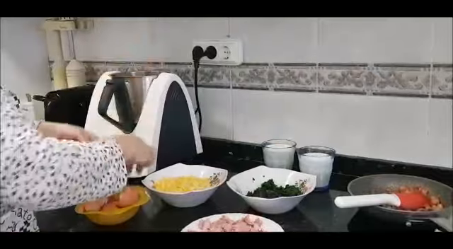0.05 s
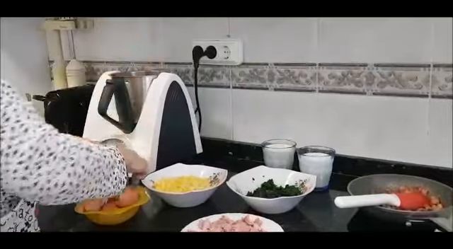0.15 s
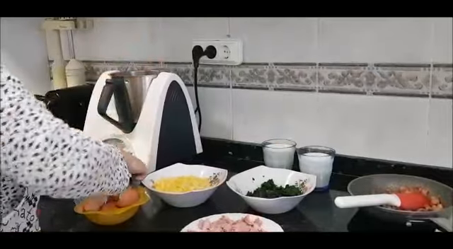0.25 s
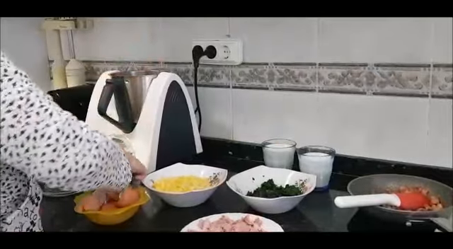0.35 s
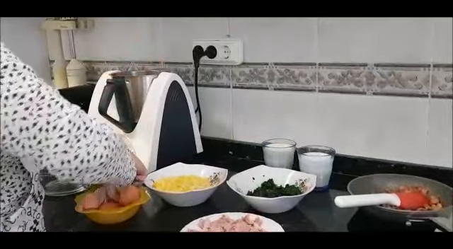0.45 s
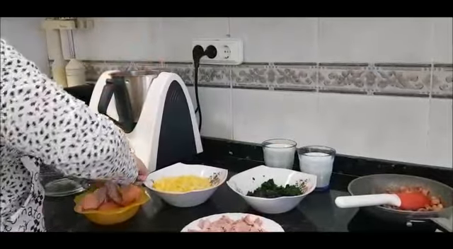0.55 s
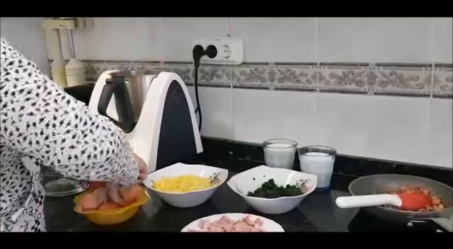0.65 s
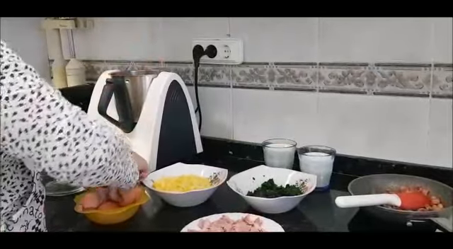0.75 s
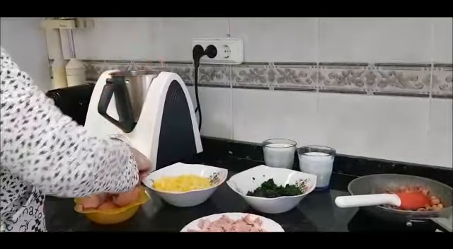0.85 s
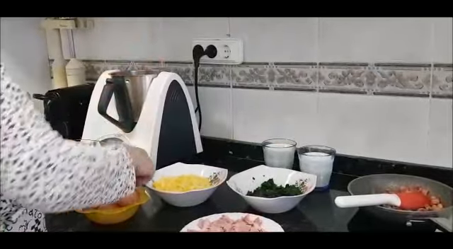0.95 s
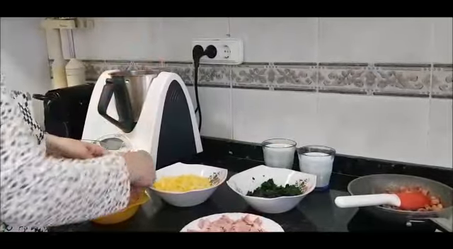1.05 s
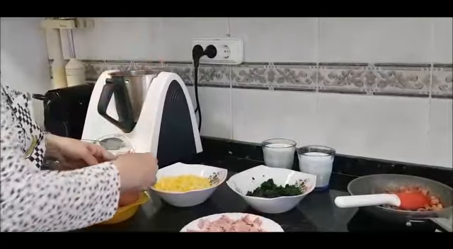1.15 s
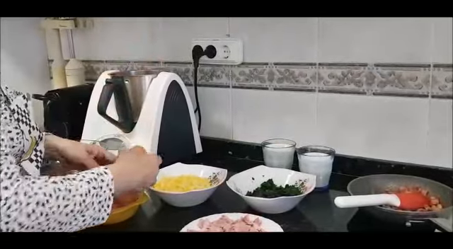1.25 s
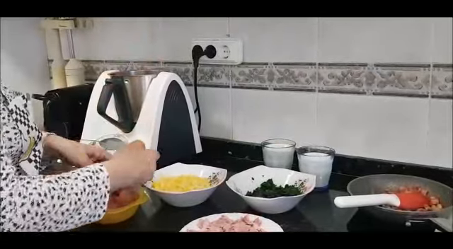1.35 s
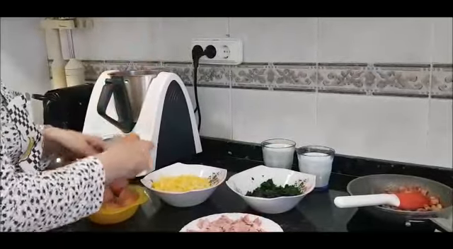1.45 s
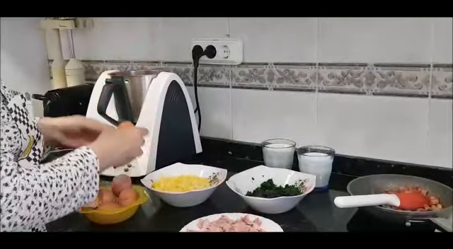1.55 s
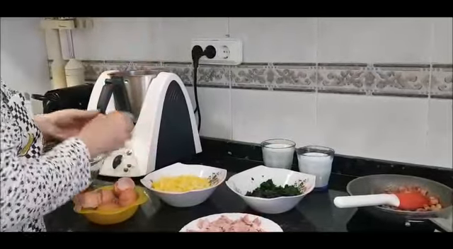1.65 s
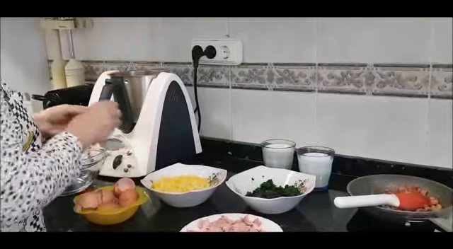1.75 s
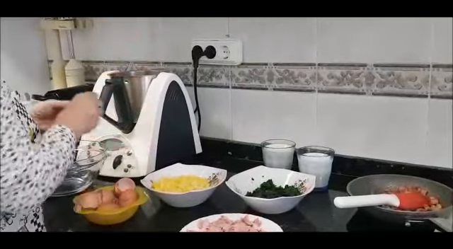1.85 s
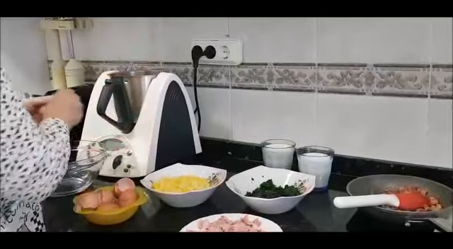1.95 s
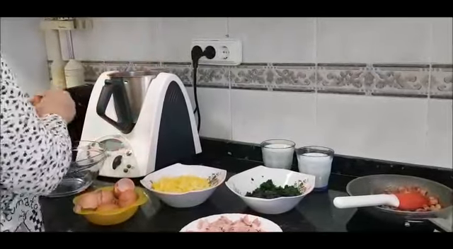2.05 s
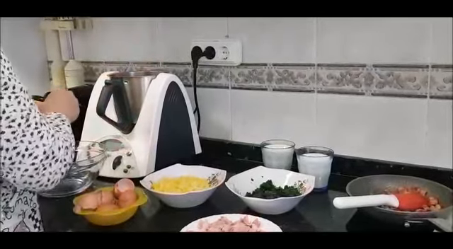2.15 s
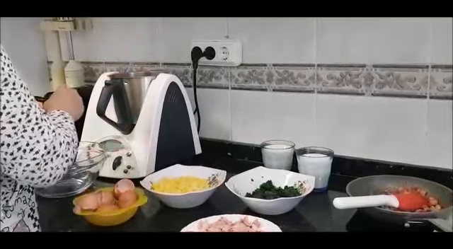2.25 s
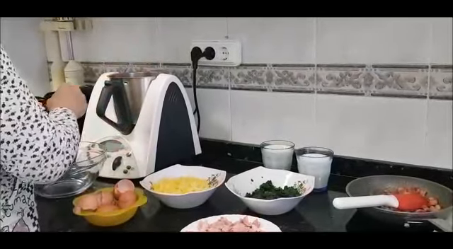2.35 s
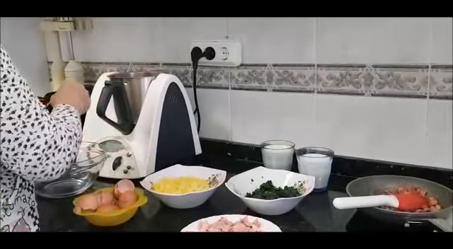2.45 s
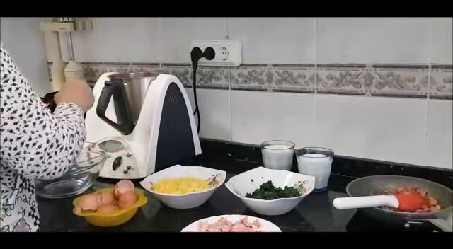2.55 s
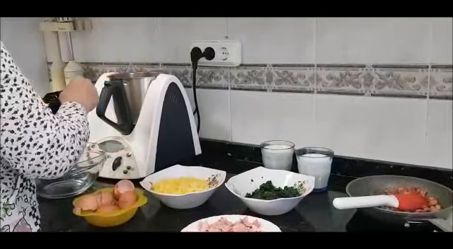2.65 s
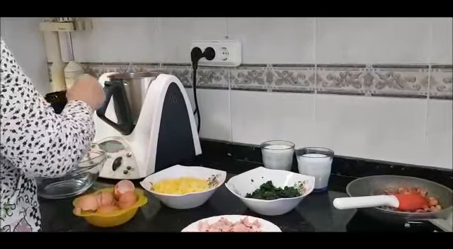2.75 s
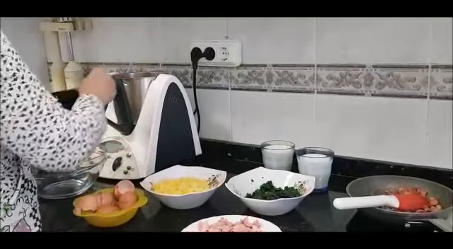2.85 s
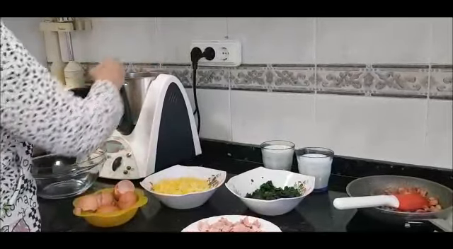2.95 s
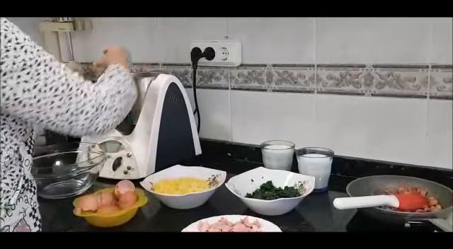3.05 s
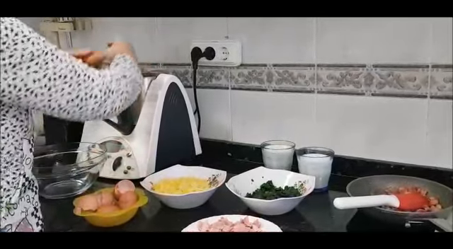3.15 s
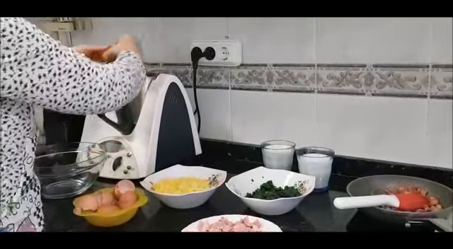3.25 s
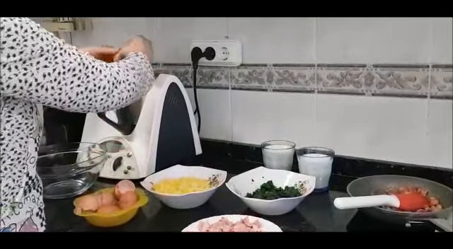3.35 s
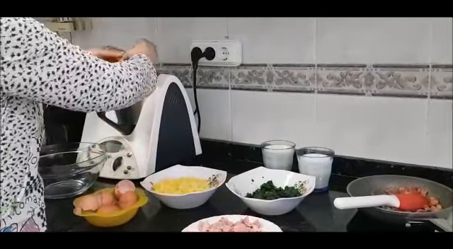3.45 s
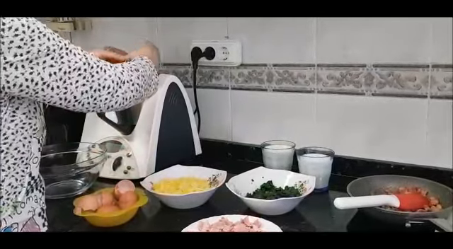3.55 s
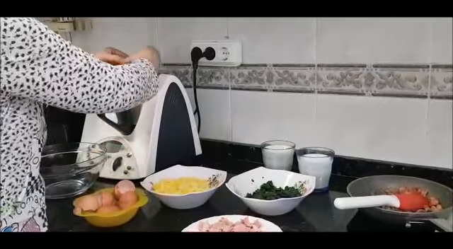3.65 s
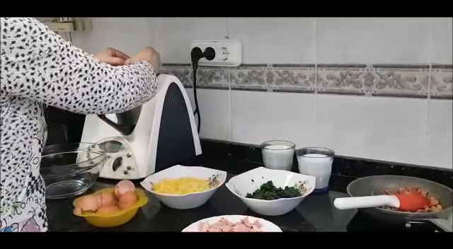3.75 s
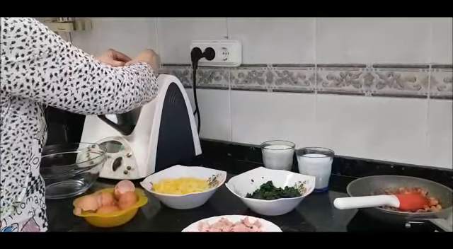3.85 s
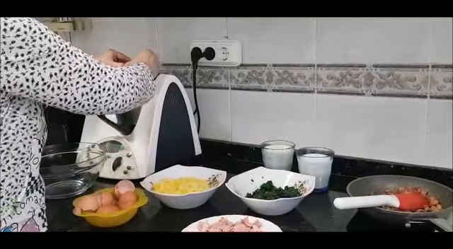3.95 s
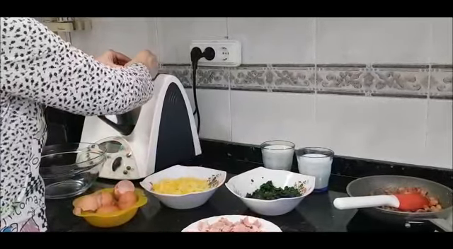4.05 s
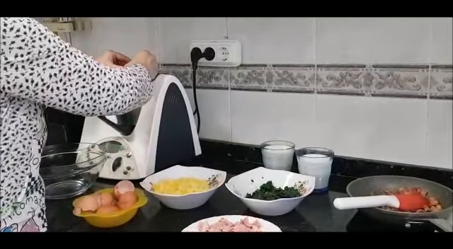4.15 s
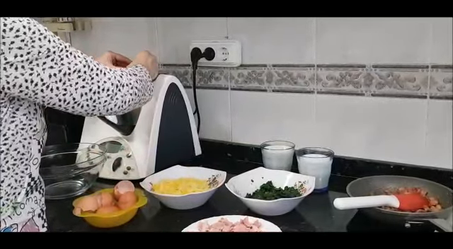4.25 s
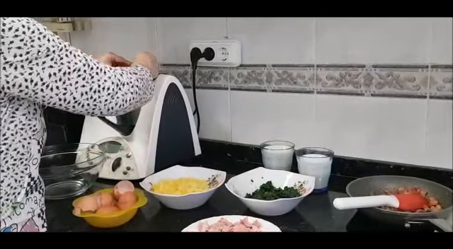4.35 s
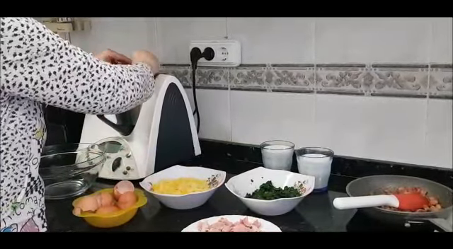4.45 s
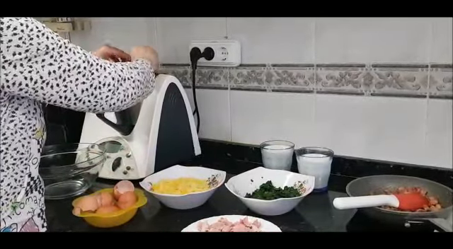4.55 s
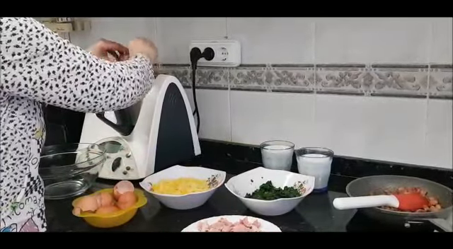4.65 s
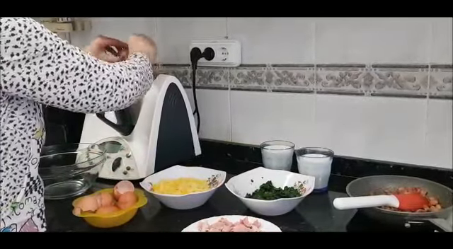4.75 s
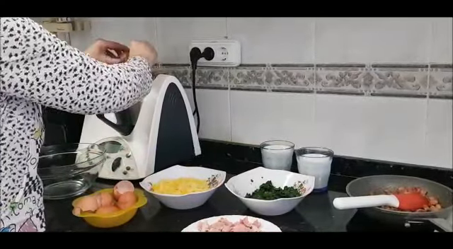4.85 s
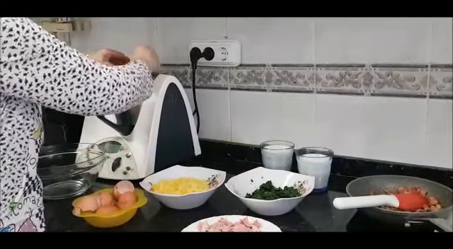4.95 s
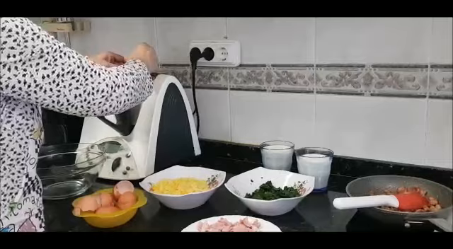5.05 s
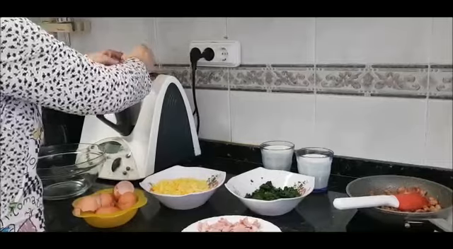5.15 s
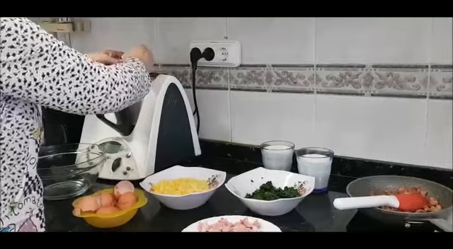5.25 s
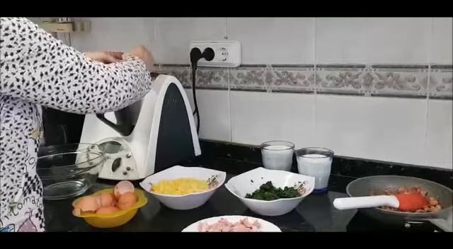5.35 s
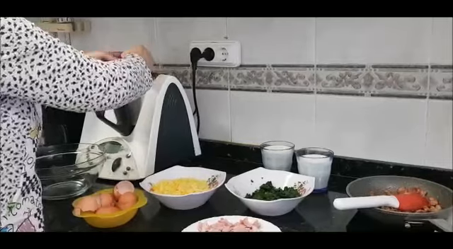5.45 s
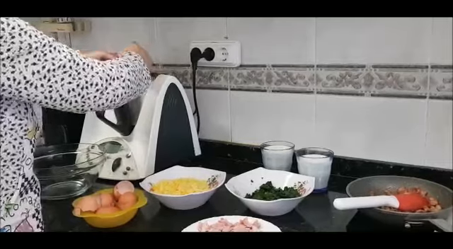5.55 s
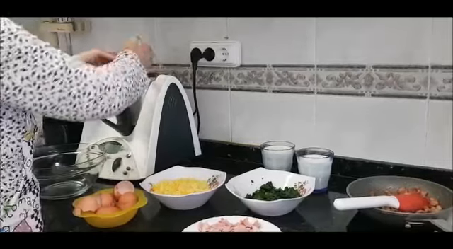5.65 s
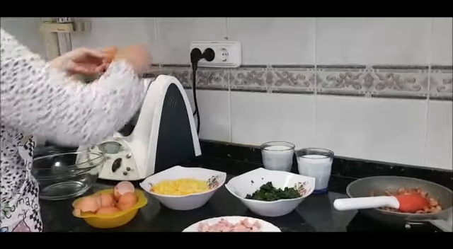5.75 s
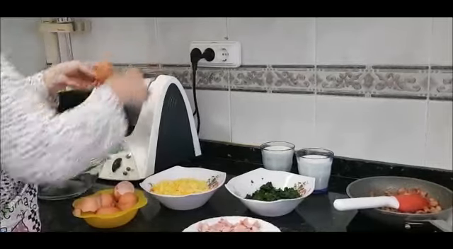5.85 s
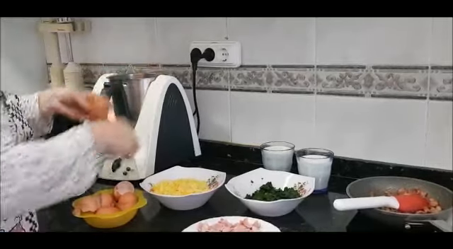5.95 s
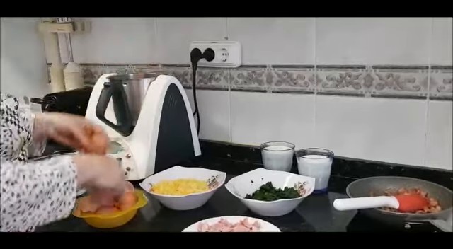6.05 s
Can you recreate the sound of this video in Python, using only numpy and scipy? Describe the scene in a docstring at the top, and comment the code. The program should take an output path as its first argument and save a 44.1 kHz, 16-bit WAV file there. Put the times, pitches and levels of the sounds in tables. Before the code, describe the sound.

A hand rummages among whole eggs in a plastic bowl, with hollow clacks, bright ticks and short gliding scrapes. After a pause, an egg strikes a kitchen machine's steel rim hard, then more weakly. Small shell snaps follow, then a crackling pull and a soft low plop. Close stereo microphone in a small tiled kitchen, with faint air and hum.

```python
"""In a tiled kitchen with air, hum and hiss, a hand rummages among eggs in a plastic bowl: fracture
bursts knock through clack and tick filters, and grains grate in gliding resonances.
An egg is tapped twice on a kitchen machine's steel rim: gritty bursts, decaying rim and machine modes.
Thumbs press (low noise) and pry the shell apart in filtered snaps and crackling pulls.
The egg drops into the machine's bowl as two soft low noise lumps; faint rumbles come and go."""
import sys
import numpy as np
from scipy import signal
from scipy.fft import rfft, irfft
from scipy.io import wavfile
from scipy.ndimage import uniform_filter1d

SR = 44100
rng = np.random.default_rng(int(sys.argv[2]) if len(sys.argv) > 2 else 0)


def transcribe(signal):
    """Save signal, clipped to [-1, 1], as a 16-bit WAV file at the path in sys.argv[1]."""
    frames = np.atleast_2d(signal).T
    limited = np.clip(frames, -1, 1)
    pcm = np.round(limited * 32767).astype(np.int16)
    wavfile.write(sys.argv[1], SR, pcm)


N = 269568

EDGE_HZ = 16300  # upper band limit
RING_S = np.arange(19200) / SR  # time axis of one burst
GIVE_S = 0.003  # first give of the shell ahead of the break

# Likeness of the room sound at the two microphones. Each row: frequency in Hz, correlation.
MIC_LIKENESS = [(60, 0.79), (250, 0.87), (550, 0.54), (1100, 0.013), (2200, 0.00062), (16000, -0.043)]
# Clack colour of whole eggs. Each row: frequency in Hz, relative gain in dB.
EGG_CLACK_COLOUR = [(350, -41), (600, -9.5), (776, -6), (1010, 0), (1550, 3), (1740, -7), (1990, 0.5),
                    (2590, -2), (2880, -4), (4300, -8.5), (5000, -23), (6500, -41), (11000, -120)]
# Bright tick colour of eggshell. Each row: frequency in Hz, relative gain in dB.
TICK_COLOUR = [(1500, -45), (3200, -6.5), (4500, 1), (5600, 4), (7000, 1), (9000, 0.5), (11000, 0),
               (13500, -2), (16000, -17)]
# Thud colour of the plastic bowl. Each row: frequency in Hz, relative gain in dB.
BOWL_COLOUR = [(60, -25.5), (140, -7.5), (210, -3.5), (285, 0.5), (390, -9), (560, 4.5), (750, -5),
               (1000, 6.5), (1600, -31)]
# Colour of breaking shell. Each row: frequency in Hz, relative gain in dB.
SHELL_COLOUR = [(1500, -37), (3000, 1), (5000, -0.5), (7000, -4), (9000, 0.5), (11000, -3), (13500, -3.5),
                (16000, -10.5)]
# Soft low colour of fingers and landing egg. Each row: frequency in Hz, relative gain in dB.
PLOP_COLOUR = [(30, -35), (55, -1), (80, -3), (140, -1.5), (210, -3), (285, 0), (380, -10), (450, -5),
               (550, -17), (750, -17), (1200, -71), (2500, -100)]


def amp(db):
    """Decibels to gain."""
    return 10 ** (np.asarray(db) / 20)


def read(points, hz):
    """Reads a table on a log-frequency axis."""
    f, value = np.transpose(points)
    return np.interp(np.log(hz + 1), np.log(f + 1), value)


def level(points):
    """Gain at every sample from rows that begin (s, dB); silent outside them."""
    s, db = np.transpose(points)[:2]
    return amp(np.interp(np.arange(N) / SR, s, db, left=-np.inf, right=-np.inf))


def evened(x):
    """Scales to unit rms."""
    return x / np.sqrt(np.mean(x ** 2) + 1e-20)


def peaked(x, size=660):
    """Scales so that the loudest moment has unit rms."""
    power = uniform_filter1d((x ** 2).mean(0), size, mode="constant")
    return x / np.sqrt(power.max() + 1e-20)


def add(mix, s, sound):
    """Mixes a sound in at time s, cut at the end of the mix."""
    part = mix[:, round(s * SR):][:, :sound.shape[1]]
    part += sound[:, :part.shape[1]]


def bell(hz, centre_hz, width_hz):
    """Gain in dB of one resonance."""
    detuning = (hz ** 2 - centre_hz ** 2) / (width_hz * (hz + 1))
    return -10 * np.log10(1 + detuning ** 2)


def colour(x, shape, size=2048):
    """Causal minimum-phase filter whose dB response is shape(Hz)."""
    gain_db = np.maximum(shape(abs(np.fft.fftfreq(size, 1 / SR))), -100)
    log_gain = np.log(amp(gain_db))
    taps = np.fft.ifft(np.exp(np.conj(signal.hilbert(log_gain)))).real
    return signal.fftconvolve(x, taps[None], axes=1)[:, :x.shape[1]]


def diffuse(x):
    """Two unrelated channels become a room field: alike in the bass, apart in the treble."""
    a, b = rfft(x)
    same = np.clip(read(MIC_LIKENESS, np.fft.rfftfreq(x.shape[1], 1 / SR)), -1, 1)
    return irfft([a, same * a + np.sqrt(1 - same ** 2) * b], x.shape[1])


def noise(spectrum):
    """Steady diffuse noise of a given colour, at unit rms."""
    z = rfft(diffuse(rng.standard_normal((2, N))))
    gain = amp(read(spectrum, np.fft.rfftfreq(N, 1 / SR)))
    return evened(irfft(z * gain, N))


def kitchen(direct=0.067, bright=0.39, early_db=3, early_t60_s=0.1, t60_s=0.36):
    """Echoes for one spot: the straight path, worktop and tiles close by, then the room."""
    sparse = rng.standard_normal((2, len(RING_S))) * (rng.random((2, len(RING_S))) < 2000 / SR)
    near = evened(sparse) * amp(early_db - 60 * RING_S / early_t60_s)
    far = rng.standard_normal(sparse.shape) * amp(-60 * RING_S / t60_s)
    echoes = diffuse(near + far)
    echoes /= np.linalg.norm(echoes[0])
    echoes[:, :2] += [direct + bright, -bright]  # the straight path keeps most treble
    return echoes


def whitened(x, size=160):
    """Evens out the broad colour of a burst and keeps its fine ripple."""
    power = uniform_filter1d((abs(rfft(x)) ** 2).mean(0), size)
    hz = np.fft.rfftfreq(x.shape[1], 1 / SR)
    return colour(x, lambda f: -10 * np.log10(np.interp(f, hz, power) + 1e-12), size=1024)


def fracture(rise_s, length_s=0.0082, per_s=5000, grit=0.2, sharp_s=0.002, give_share=0.17):
    """A faint first give, then a run of tiny slips and breaks; a quick contact has one hard click."""
    t = RING_S[:len(RING_S) // 4] - GIVE_S
    rise_s = max(rise_s, 1e-4)
    since = np.maximum(t, 0)
    slips = rng.standard_normal(len(t)) * (rng.random(len(t)) < per_s / SR)
    build_up = give_share + 1 - np.exp(-since / rise_s)
    force = grit * slips * build_up * np.exp(-since / (length_s + rise_s))
    force[round((GIVE_S + min(rise_s, sharp_s)) * SR)] += np.exp(-rise_s / sharp_s)
    echoed = signal.fftconvolve(kitchen(), force[None], axes=1)
    return whitened(echoed[:, :len(RING_S)])


def ring(modes, rise_s):
    """Dying modes, each reaching the two microphones with its own phase."""
    out = np.zeros((2, len(RING_S)))
    for hz, db, t60_s in modes:
        apart = np.arccos(np.clip(read(MIC_LIKENESS, hz), -1, 1)) * rng.choice([-1, 1])
        phase = 2 * np.pi * rng.random() + np.array([[0], [apart]])
        out += amp(db - 60 * RING_S / t60_s) * np.sin(2 * np.pi * hz * RING_S + phase)
    return peaked(out * (1 - np.exp(-RING_S / rise_s)))


def swells(rows):
    """Gain at every sample from strokes (start s, length s, dB), each one arch."""
    peak_share, point = 0.39, 0.99  # peak time as a share of the stroke; pointedness
    out = np.zeros((1, N))
    skew = np.log(0.5) / np.log(peak_share)
    for start, length, db in rows:
        u = np.arange(0, length, 1 / SR) / length
        add(out, start, amp(db) * abs(np.sin(np.pi * u[None] ** skew)) ** point)
    return out[0]


def resonate(x, hz, width_hz):
    """A resonance of gain 1 that follows the curve hz: shift down, low-pass, shift back."""
    turn = np.exp(2j * np.pi * np.cumsum(hz) / SR)
    r = np.exp(-np.pi * width_hz / SR)
    low = signal.lfilter([(1 - r) ** 2], [1, -2 * r, r * r], x / turn + 1e-18)
    return 2 * (turn * low).real


def crackle(sung_gain, broad_gain, hz, spectrum, per_s, width_hz, uneven_db=4.5):
    """Uneven grains drive a resonance along hz and a broad colour, each with its gain; the kitchen echoes."""
    sizes = rng.choice([-1, 1], N) * amp(uneven_db * np.minimum(rng.exponential(1, N), 4))
    grains = (sizes * (rng.random(N) < per_s / SR))[None]
    sung = sung_gain * evened(resonate(grains, hz, width_hz))
    broad = broad_gain * evened(colour(grains, lambda f: read(spectrum, f)))
    return signal.oaconvolve(sung + broad, whitened(kitchen()), axes=1)[:, :N]


def still_air():
    """Steady coloured noise of the still kitchen."""
    # Each row: frequency in Hz, relative gain in dB.
    air_colour = [(20, -26), (35, -5), (60, -7), (90, -7), (130, -10.5), (220, -14), (330, -15.5),
                  (480, -19), (680, -20), (950, -29.5), (1350, -23.5), (1800, -21.5), (2700, -33.5),
                  (6500, -47), (11000, -29), (16000, -30)]
    return amp(-63.5) * noise(air_colour)


def hiss():
    """A thin noise that swells and then sinks away."""
    # Each row: frequency in Hz, relative gain in dB.
    hiss_colour = [(410, -39), (700, -11), (1170, -10), (1750, 3), (1890, -8.5), (2660, -9.5), (3070, -7),
                   (8880, -6.5), (16000, -14.5)]
    # Each row: time in seconds, level in dB.
    hiss_level = [(0, -62), (.3, -68.5), (1.0, -57.5), (1.95, -62.5), (2.4, -62.5), (2.7, -64.5),
                  (3.0, -76.5), (6.1, -78.5)]
    return level(hiss_level) * noise(hiss_colour)


def hum(waver_hz=5):
    """An appliance's wavering hum: narrow bands of noise."""
    # Each row: frequency in Hz, level in dB.
    tones = [(49, -78.5), (219, -69), (281, -74.5), (633, -75.5)]
    out = np.zeros((2, N))
    hz = np.fft.rfftfreq(N, 1 / SR)
    white = rfft(diffuse(rng.standard_normal((2, N))))
    for centre, db in tones:
        width = waver_hz * (1 + (centre / 250) ** 2)  # higher tones blur into narrow hiss
        out += amp(db) * evened(irfft(white * amp(2 * bell(hz, centre, width)), N))
    return out


def rumble():
    """Faint arched swells of low noise."""
    # Each row: start in seconds, length in seconds, level in dB.
    rumble_swells = [(0.1, 1, -65.5), (.95, 0.8, -60), (3.35, 0.13, -65), (3.6, .2, -57.5),
                     (4.75, 0.3, -60)]
    # Each row: frequency in Hz, relative gain in dB.
    rumble_colour = [(15, -44), (30, -9.5), (50, 10.5), (85, -6), (130, -20.5), (300, -37), (1000, -68.5)]
    return swells(rumble_swells) * noise(rumble_colour)


def finger_presses():
    """Fingers press the shell and empty it: arched low noise."""
    # Each row: start in seconds, length in seconds, level in dB.
    presses = [(3.2, 0.66, -61.5), (5.46, 0.57, -67.5)]
    return swells(presses) * noise(PLOP_COLOUR)


def egg_drop(attack_s=0.016, hold_s=0.043, fade_db_per_s=196):
    """The egg slides into the machine's bowl: each lump lands, spreads and dies away in low noise."""
    # Each row: start in seconds, level in dB.
    lumps = [(5.366, -47.5), (5.425, -57)]
    gain = np.zeros(N)
    for s, db in lumps:
        t = np.arange(N) / SR - s
        fade_db = fade_db_per_s * np.maximum(t - hold_s, 0)
        gain += np.clip(t / attack_s, 0, 1) * amp(db - fade_db)
    return gain * noise(PLOP_COLOUR)


def egg_rolls(grating_trim_db=-3.5, scrape_trim_db=-4, bowl_trim_db=-4, bowl_ring_trim_db=-11,
              bowl_hz=290, rasp_trim_db=-20):
    """Rough shells grate in a resonance that glides during each roll; the plastic bowl rumbles under them."""
    # Each row: start in seconds, length in seconds, grating in dB before trims,
    # first pitch in Hz, last pitch in Hz, bowl in dB before trims.
    rolls = [(0.25, 0.21, -61.5, 1430, 1700, -62.5), (0.464, 0.097, -36.5, 1707, 1350, -43),
             (0.555, 0.11, -42, 1480, 1650, -46), (0.716, .09, -43.5, 1900, 1900, -55),
             (0.807, 0.17, -46.5, 2070, 2150, -73), (0.899, 0.19, -34, 1820, 1450, -47),
             (1.13, 0.078, -48, 1370, 1280, -73), (1.204, .07, -35, 1650, 1630, -51.5),
             (1.263, 0.26, -40.5, 1560, 2100, -61.5), (1.444, 0.056, -35, 1710, 1650, -41.5),
             (1.551, 0.27, -39, 1480, 2000, -68)]
    t = np.arange(N) / SR
    gains = np.array([swells([row[:3]]) for row in rolls])
    glides = [np.interp(t, [start, start + length], [first, last])
              for start, length, _, first, last, _ in rolls]
    gain = gains.sum(0)
    hz = np.average(glides, axis=0, weights=gains + 1e-9)
    push = swells([(start, length, bowl_db) for start, length, _, _, _, bowl_db in rolls])
    grating = crackle(amp(grating_trim_db) * gain, amp(scrape_trim_db) * gain, hz,
                      EGG_CLACK_COLOUR, per_s=330, width_hz=355)
    bowl = crackle(amp(bowl_ring_trim_db) * push, amp(bowl_trim_db) * push, np.full(N, bowl_hz),
                   BOWL_COLOUR, per_s=300, width_hz=580)
    rasp = amp(rasp_trim_db) * gain * noise(TICK_COLOUR)
    return grating + bowl + rasp


def egg_knocks(clack_trim_db=-2.5, tick_trim_db=-1, width_hz=1500, dull_db_per_s=900, tock_trim_db=-6):
    """Whole eggs clack against each other and the plastic bowl: bursts through three colours and a ring."""
    # Each row: time in seconds, clack in dB before trims, clack pitch in Hz,
    # shell tick in dB before trim, contact build-up in seconds.
    knocks = [(0.279, -56.5, 1440, -64, 0.0012), (0.383, -39, 2000, -43.5, 0.015),
              (0.5186, -40, 1290, -46, 0.0019), (0.7237, -43, 1800, -54, 0.00018),
              (0.827, -42, 2210, -45, 0.019), (0.971, -33, 1900, -39, 0.0014),
              (0.9932, -31, 1560, -44, 0.00075), (1.016, -32, 1560, -32, 0.00096),
              (1.087, -37, 1450, -43.5, 0.00041), (1.15, -67, 1390, -50.5, 0.00053),
              (1.251, -42, 1780, -51.5, 0.0018), (1.3416, -31, 2120, -56, 0.00052),
              (1.3774, -22.5, 2030, -33, .0003), (1.439, -31.5, 1200, -43.5, 0.00096),
              (1.47, -34.5, 1570, -56, .002), (1.5636, -31, 1440, -52.5, .0006),
              (1.5936, -36, 1390, -43, 0.0018), (1.738, -38.5, 2110, -44, 0.0023)]
    # the bowl's thud grows with the clack: dB before trim under a typical clack, dB per dB
    typical_clack_db, typical_thud_db, thud_slope = -36, -50.5, 0.57
    out = np.zeros((2, N))
    for s, clack_db, hz, tick_db, rise_s in knocks:
        blow = fracture(rise_s, length_s=0.0039, grit=0.26)
        thud_db = typical_thud_db + thud_slope * (clack_db - typical_clack_db)
        clack = colour(blow, lambda f: read(EGG_CLACK_COLOUR, f) + bell(f, hz, width_hz))
        # a slow scrape has less top than a quick knock
        tick = colour(blow, lambda f: read(TICK_COLOUR, f) - dull_db_per_s * rise_s * (f / EDGE_HZ) ** 2)
        thud = colour(blow, lambda f: read(BOWL_COLOUR, f))
        sound = amp(clack_db + clack_trim_db) * peaked(clack)
        sound += amp(tick_db + tick_trim_db) * peaked(tick)
        sound += amp(thud_db + clack_trim_db) * peaked(thud)
        add(out, s - GIVE_S, sound)
        # a quick knock also rings the egg for a few cycles
        tock_gain = amp(clack_db + tock_trim_db) * np.exp(-rise_s / 0.013)
        add(out, s, tock_gain * ring([(hz, 0, 0.018)], rise_s=0.001))
    return out


def tearing(hollow_trim_db=-4, fizz_trim_db=-3):
    """Each pull fizzes in the shell and crackles in the hollow, which deepens as the halves part."""
    # Each row: start in seconds, length in seconds, hollow in dB before trim, shell fizz in dB before trim.
    pulls = [(3.429, 0.078, -59, -57), (3.939, 0.066, -65, -57.5), (5.15, 0.091, -56, -48.5),
             (5.288, 0.05, -39.5, -51), (5.331, 0.12, -42.5, -49.5), (5.44, 0.068, -45.5, -43),
             (5.546, 0.048, -34.5, -33.5), (5.58, 0.073, -48, -74)]
    part_s, parting_s, closed_hz, open_hz = 5.324, 0.16, 2360, 1800  # parting_s: time constant
    closed = np.exp(-np.maximum(np.arange(N) / SR - part_s, 0) / parting_s)
    hz = open_hz + (closed_hz - open_hz) * closed
    hollow = swells([(start, length, db + hollow_trim_db) for start, length, db, _ in pulls])
    fizz = swells([(start, length, db + fizz_trim_db) for start, length, _, db in pulls])
    return crackle(hollow, fizz, hz, SHELL_COLOUR, per_s=580, width_hz=700)


def shell_snaps(clack_trim_db=-3, tick_trim_db=-1, width_share=0.42, tick_share=0.56, fizz_floor_db=-9,
                tock_trim_db=-8, tock_t60_s=0.015, rise_s=0.0007):
    """Each break in the shell ticks and rings the hollow between shell and hands."""
    # Each row: time in seconds, clack in dB before trims, clack pitch in Hz,
    # shell tick in dB before trim, tick pitch in Hz.
    snaps = [(3.5312, -81, 1470, -56.5, 9050), (3.970, -55, 1580, -58, 8500), (4.195, -70, 1720, -64, 8600),
             (4.252, -41, 1370, -36, 5300), (4.4444, -43, 1390, -50.5, 7800),
             (4.4988, -35.5, 1560, -52, 5030), (4.5173, -67, 1360, -40.5, 5100),
             (4.572, -45, 1420, -51.5, 5050), (4.996, -74, 1770, -57.5, 11700),
             (5.162, -72, 2260, -59, 10700), (5.2494, -38.5, 2150, -42, 5340),
             (5.2982, -44, 1650, -44.5, 3650), (5.5292, -46.5, 1900, -47, 6560)]
    # a flexing shell clicks cleanly, a breaking one is gritty: slope in dB per dB of tick over clack
    base_grit, grit_slope = 0.27, 0.21
    out = np.zeros((2, N))
    for s, clack_db, hz, tick_db, tick_hz in snaps:
        grit = base_grit * amp(grit_slope * (tick_db - clack_db))
        blow = fracture(rise_s, length_s=0.0066, grit=grit)
        clack = colour(blow, lambda f: 2 * bell(f, hz, width_share * hz))

        def piece(f):
            """The size of the broken piece sets the pitch of its tick."""
            peak_db = 2 * bell(f, tick_hz, tick_share * tick_hz)
            return read(SHELL_COLOUR, f) + np.maximum(peak_db, fizz_floor_db)

        sound = amp(clack_db + clack_trim_db) * peaked(clack)
        sound += amp(tick_db + tick_trim_db) * peaked(colour(blow, piece))
        add(out, s - GIVE_S, sound)
        # a sudden snap also sounds the hollow as one short clean note
        add(out, s, amp(clack_db + tock_trim_db) * ring([(hz, 0, tock_t60_s)], rise_s=0.00083))
    return out


def hollow_thuds(trim_db=-3):
    """Hollow thuds as the thumbs break through and as the egg lands: bursts in one resonance."""
    # Each row: time in seconds, level in dB before trim.
    thuds = [(4.252, -51.5), (5.38, -46.5)]
    out = np.zeros((2, N))
    for s, db in thuds:
        thud = colour(fracture(0.002), lambda f: 2 * bell(f, 462, 103))
        add(out, s - GIVE_S, amp(db + trim_db) * peaked(thud))
    return out


def rim_taps(rattle_trim_db=-10):
    """The whole shell strikes hard and rings the rim; once cracked it gives way and mostly thumps."""
    # Each row: time in seconds, clack in dB, crunch in dB, thump in dB, rim ring in dB,
    # crush build-up in seconds.
    taps = [(2.4735, -17.5, -21, -33, -29.5, 0.0012), (2.7369, -28.5, -28.5, -31.5, -41.5, 0.002)]
    # Modes of the rim, then of the machine under it. Each row: frequency in Hz, relative level in dB,
    # t60 in seconds.
    rim_modes = [(680, 9, 0.23), (875, 7.5, .25), (945, -28, 0.21), (1045, 0, 0.36), (1176, -8, .3),
                 (1260, -3.5, 0.13), (1210, -2.5, 0.34), (1420, -12.5, .28), (1470, -16.5, .22),
                 (1445, -6, .26), (1710, -15, .2), (1794, -0.5, 0.18), (1675, -15, 0.074),
                 (1750, -6.5, .26), (2140, -29, 0.14), (2400, -9.5, .25), (2835, -33.5, 0.37),
                 (2820, -18, 0.22)]
    machine_modes = [(71.4, -10.5, 0.49), (126, -1, 0.18), (155.6, -0.5, 0.37), (210, -15, 0.83),
                     (287, -4.5, .25), (314, -0.5, 0.2)]
    # Colours of the clack and the crunch. Each row: frequency in Hz, relative gain in dB.
    clack_colour = [(150, -19), (280, -20.5), (420, -22.5), (600, -16), (800, -13), (1050, -11.5),
                    (1270, 0), (1500, -5.5), (1850, -6.5), (2400, -8.5), (3200, -14), (4500, -34.5),
                    (9000, -72.5)]
    crunch_colour = [(700, -30.5), (1500, 7.5), (2100, -0.5), (3000, 5), (4400, -5.5), (5400, -2.5),
                     (6500, -9), (8500, -5.5), (10600, -4.5), (13000, -9), (16000, -22.5)]
    out = np.zeros((2, N))
    for s, clack_db, crunch_db, thump_db, rim_db, rise_s in taps:
        blow = fracture(rise_s, length_s=0.0056, per_s=3900, grit=0.58, give_share=0.01)
        clack = colour(blow, lambda f: read(clack_colour, f))
        crunch = colour(blow, lambda f: read(crunch_colour, f))
        rattle = colour(blow, lambda f: bell(f, 300, 320))  # the housing's dense low ring
        sound = amp(clack_db) * peaked(clack) + amp(crunch_db) * peaked(crunch)
        sound += amp(thump_db + rattle_trim_db) * peaked(rattle)
        add(out, s - GIVE_S, sound)
        thump = amp(thump_db) * ring(machine_modes, rise_s=0.0057)
        add(out, s, thump + amp(rim_db) * ring(rim_modes, rise_s=0.008))
    return out


def scene():
    """Picking, tapping, prying and the soft drop, over the quiet room."""
    room = still_air() + hiss() + hum() + rumble()
    soft = finger_presses() + egg_drop()
    eggs = egg_rolls() + egg_knocks()
    opening = tearing() + shell_snaps() + hollow_thuds()
    return room + soft + eggs + opening + rim_taps()


def record(dry):
    """The microphones lose the deepest bass and differ in treble; then the band limit."""
    # Each row: frequency in Hz, left minus right in dB.
    tilt = [(60, 1.5), (300, .5), (1100, 1), (2000, -0.6), (4000, -1.5), (6000, 3), (8500, 11.5),
            (11000, 5), (15000, 1.5)]
    low_cut_hz = 36
    hz = np.fft.rfftfreq(N, 1 / SR)
    half_db = read(tilt, hz) / 2
    sides = amp([half_db, -half_db])
    sides = sides / np.sqrt((sides ** 2).mean(0))  # keeps the mean power of the pair
    bass = hz ** 2 / np.hypot(hz ** 2, low_cut_hz ** 2)
    heard = irfft(rfft(dry) * bass * sides, N)
    low_pass = signal.firwin(401, EDGE_HZ, window=("kaiser", 8), fs=SR)
    return signal.oaconvolve(heard, low_pass[None], "same")


dry = scene()
out = record(dry)
transcribe(out)
```